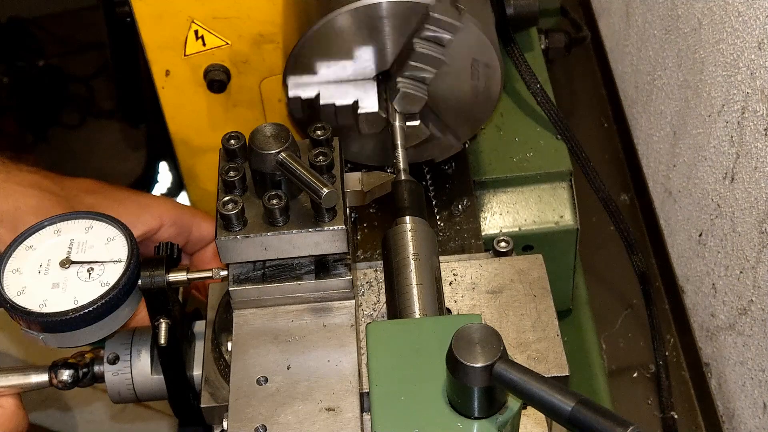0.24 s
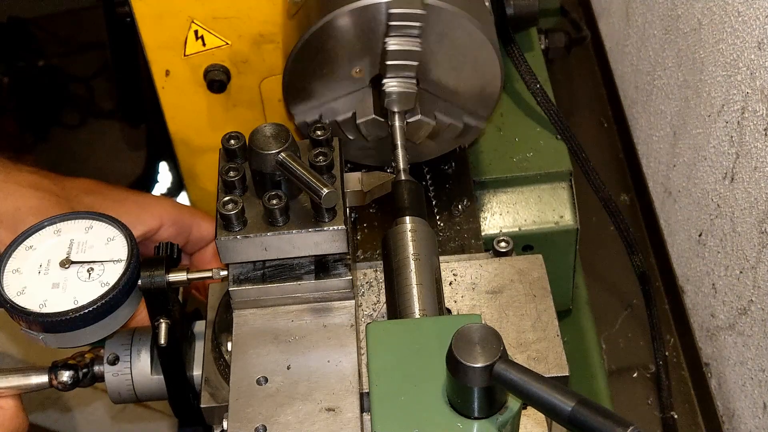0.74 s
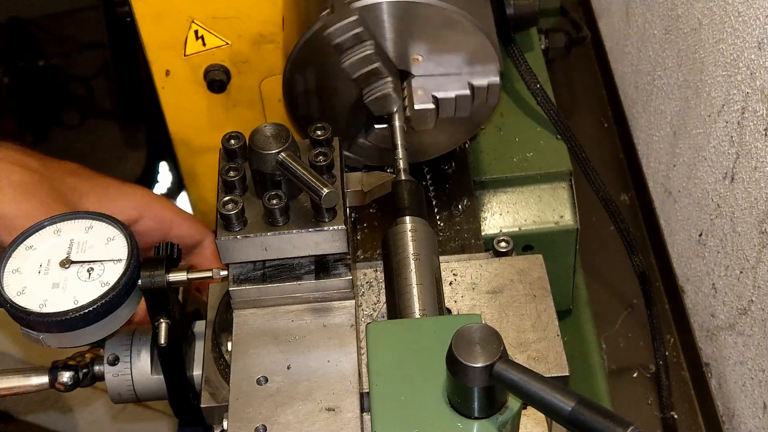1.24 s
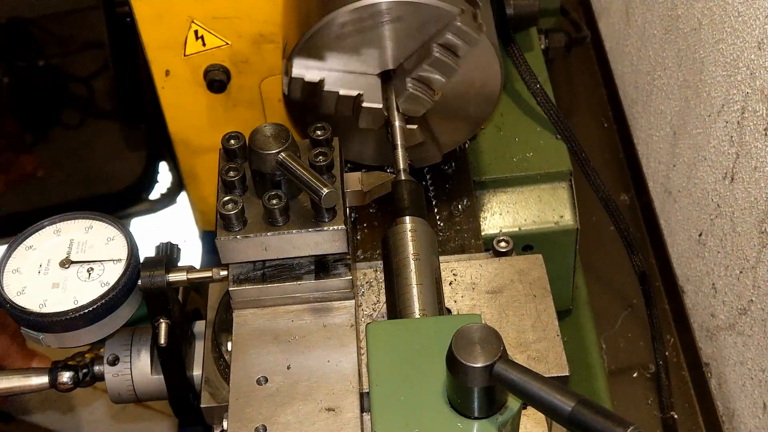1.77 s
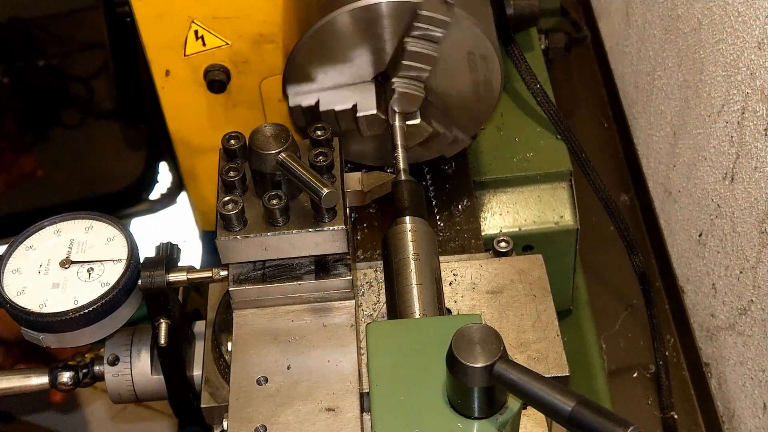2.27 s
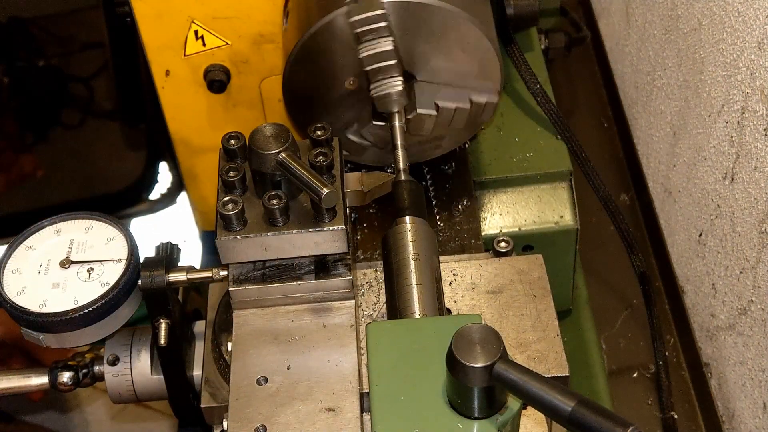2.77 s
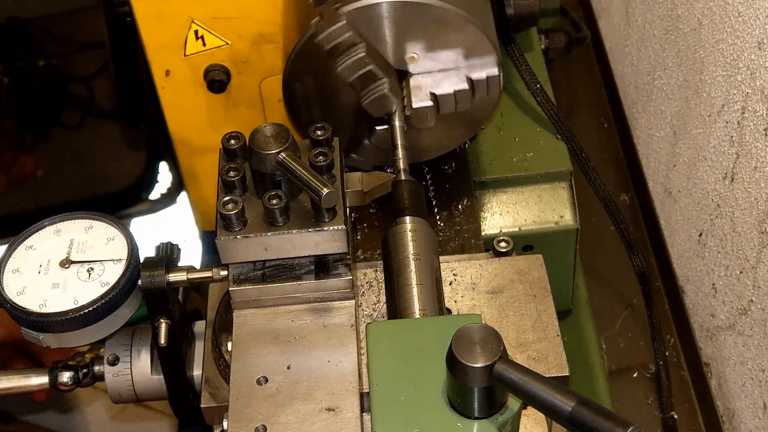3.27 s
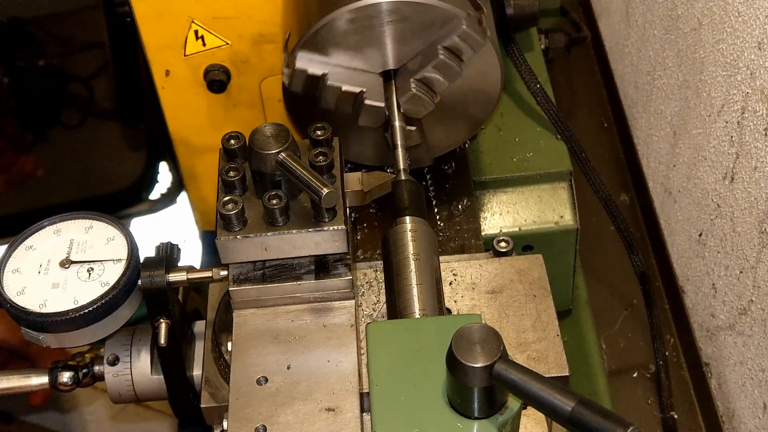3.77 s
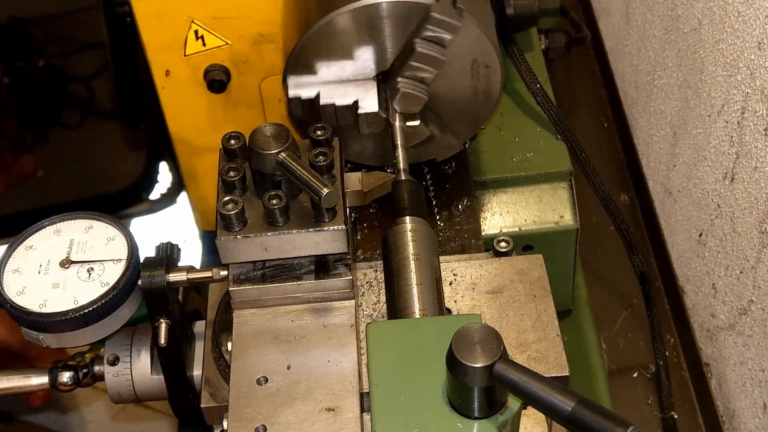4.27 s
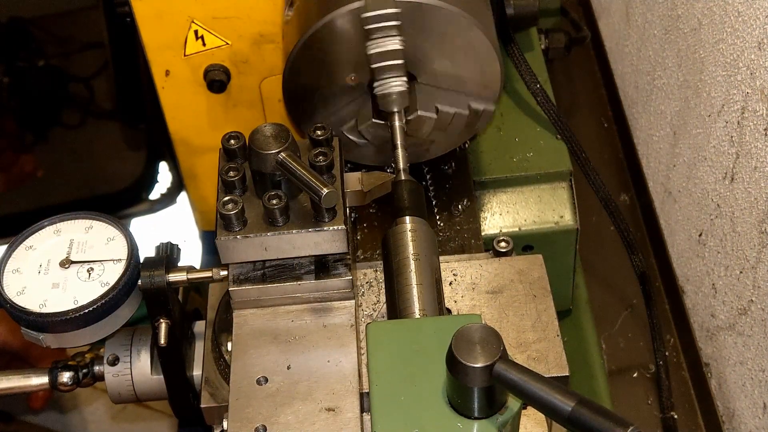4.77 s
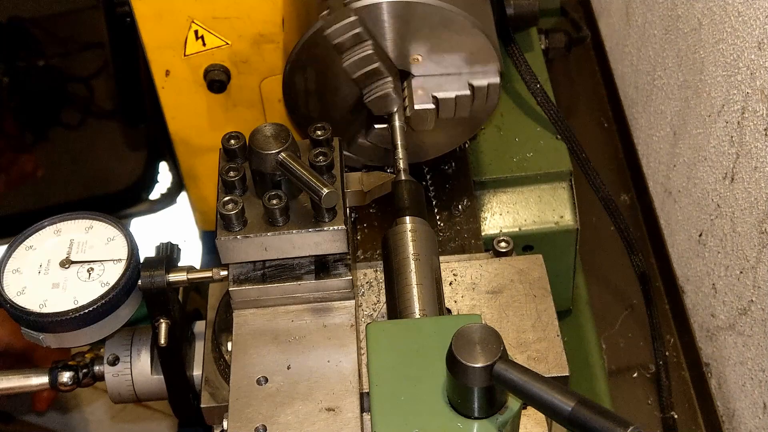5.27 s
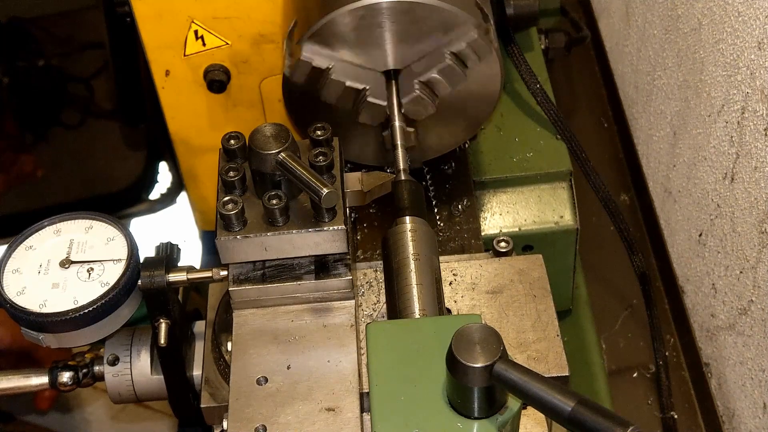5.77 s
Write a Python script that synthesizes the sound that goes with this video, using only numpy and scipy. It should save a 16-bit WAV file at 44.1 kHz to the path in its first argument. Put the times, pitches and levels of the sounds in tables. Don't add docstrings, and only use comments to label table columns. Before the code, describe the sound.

Close, dry workshop machine: wavering bass hum, hollow mid-low drone swelling about once a second, irregular gear clacks, short scuffs and flickering bearing hiss.

```python
import sys
import numpy as np
from scipy import signal
from scipy.fft import rfft, irfft, next_fast_len
from scipy.io import wavfile
from scipy.ndimage import uniform_filter1d

SR = 44100
rng = np.random.default_rng(int(sys.argv[2]) if len(sys.argv) > 2 else 0)


def wav_record(signal):
    frames = np.transpose(np.atleast_2d(signal))
    bounded = np.clip(frames, -1, 1)
    quanta = np.round(bounded * 32767).astype(np.int16)
    wavfile.write(sys.argv[1], SR, quanta)


def linear_from_db(decibels):
    return 10 ** (np.asarray(decibels, float) / 20)


N = 265923

SPINDLE_TURN_S = 2.012
CASING_HZ = 339.3
BAND_CENTRES_HZ = 15 * 2 ** np.arange(0, 10.6, 0.75)

# (frequency [Hz], level per Hz [dB])
HISS = [(2900, -3.5), (3150, -4.5), (3420, -15), (3850, -2), (4200, -10), (4560, 1.5), (5700, -10),
        (6500, -6.5), (7300, -10.5), (8400, -11), (9800, 4.5), (12150, -4), (14300, -3)]
# (frequency [Hz], width [Hz], level [dB])
COVER_EDGE = [(1514, 140, -1), (2275, 310, 3), (2580, 760, -2.5)]


def rms_one(x):
    return x / np.sqrt(np.mean(x ** 2) + 1e-20)


def at_hz(points, hz):
    points_hz, values = np.transpose(points)
    return np.interp(np.log(hz), np.log(points_hz), values)


def drift(rate_hz):
    r = np.exp(-80 * np.pi * rate_hz / SR)
    noise = rng.standard_normal(N // 40 + 2002)
    slow = signal.lfilter([1], [1, -2 * r, r * r], noise)[2000:]
    return np.interp(np.arange(N) / 40, np.arange(len(slow)), rms_one(slow))


def swells(rows, width_s):
    t = np.arange(0, N, 64) / SR
    total_db = sum(db * np.exp(-0.5 * ((t - s) / width_s) ** 2) for s, db in rows)
    return np.interp(np.arange(N) / SR, t, total_db)


def resonance(x, hz, width):
    r = np.exp(-np.pi * width / SR)
    zeros = (1 - r * r) / 2 * np.array([1, 0, -1])
    return signal.lfilter(zeros, [1, -2 * r * np.cos(2 * np.pi * hz / SR), r * r], x)


def machine_noise(spectrum, centres, shared_db, own_db, jolt):
    # (frequency [Hz], left-right likeness [0-1])
    likeness = [(30, 0.88), (85, 0.96), (170, 0.64), (340, 0.65), (700, 0.6), (1400, 0.077), (2800, 0.09),
                (5600, 0.12), (11000, .02)]
    size = next_fast_len(N)
    hz = np.maximum(np.arange(size // 2 + 1) * SR / size, 1)
    direct, room = rng.standard_normal((2, size))
    alike = np.clip(at_hz(likeness, hz), 0, 1)
    pair = np.sqrt(1 + alike) * rfft(direct) + np.sqrt(1 - alike) * rfft(room) * [[1], [-1]]
    pair = pair * linear_from_db(at_hz(spectrum, hz))
    out = 0
    for centre in centres:
        octaves = np.log2(hz / centre)
        band = np.cos(np.pi * np.clip(octaves / 1.5, -0.5, 0.5)) ** 2
        flicker = linear_from_db(shared_db * jolt + own_db * drift(24))
        out = out + flicker * irfft(pair * band, size)[:, :N]
    return rms_one(out)


def bearing_level():
    # (time [s], level [dB])
    load_shifts = [(0.12, -4.5), (0.35, 2), (0.92, 1), (1.33, 1.5), (1.8, -4.5), (2.42, -3.5), (2.5, 5.5),
                   (2.68, -3), (2.96, -3), (3.58, 2.5), (3.85, -0.5), (4.08, -3), (4.2, 4), (4.35, -4.5),
                   (4.5, 1), (4.8, 3), (4.92, 5), (5.18, -3.5), (5.4, 5), (5.6, -4), (5.75, 2),
                   (5.92, -5.5), (5.99, 4.5)]
    return -49.5 + swells(load_shifts, width_s=0.017)


def bearing_hiss(hiss_db):
    noise = machine_noise(HISS, BAND_CENTRES_HZ[13:], shared_db=2.0, own_db=1.42, jolt=drift(78))
    return linear_from_db(hiss_db + 3.5) * noise


def belt_whirr(hiss_db, load):
    noise = machine_noise(HISS, BAND_CENTRES_HZ[9:13], shared_db=0.5, own_db=1.45, jolt=load)
    return linear_from_db(0.28 * hiss_db - 37.5) * noise


def gear_rumble(load):
    # (frequency [Hz], level per Hz [dB])
    rumble_colour = [(15, -28), (35, -9.5), (48, -19.5), (75, -7.5), (105, -11.5), (135, -20), (185, -25.5),
                     (250, -18), (420, -25.5), (500, -27.5), (1150, -32), (1270, -39.5), (2600, -44.5),
                     (3000, -47)]
    # (time [s], level [dB])
    gear_load = [(0.0, -43), (0.23, -49.5), (1.17, -50.5), (1.54, -50), (1.95, -47), (2.27, -51),
                 (2.65, -45), (2.77, -46), (3.27, -49), (3.58, -54), (3.7, -49), (3.98, -47.5),
                 (4.28, -51.5), (4.94, -43.5), (5.27, -48.5), (5.48, -53.5), (6.03, -45)]
    load_db = np.interp(np.arange(N) / SR, *np.transpose(gear_load))
    noise = machine_noise(rumble_colour, BAND_CENTRES_HZ[:12], shared_db=1.48, own_db=2.36, jolt=load)
    return linear_from_db(-37 + 0.41 * (load_db - load_db.mean())) * noise


def singing_panels(load):
    # (frequency [Hz], width [Hz], level [dB rms])
    panels = [(770, 78, -54), (980, 39, -61.5), (1722, 120, -60.5), (12650, 130, -91)]
    direct, *room = rng.standard_normal((3, N))
    drive = (direct + 0.93 * np.array(room)) * linear_from_db(3.4 * load)
    return sum(linear_from_db(db) * rms_one(resonance(drive, hz, width)) for hz, width, db in panels)


def tooth_rasp():
    # (time into turn [s], level over steady rasp [dB])
    rasps = [
        (0.1, 3),
        (0.72, 10),
        (0.77, 3),
        (0.911, 6.5),
        (1.44, 10),
        (1.73, 7.5),
        (1.93, 7),
    ]
    clicks_per_s, floor_db, scuff_s = 900, -65, 0.012
    scuffs = [(s + SPINDLE_TURN_S * turn, db) for turn in range(3) for s, db in rasps]
    sizes = linear_from_db(4.4 * np.minimum(rng.exponential(1, (2, N)), 5))
    sizes = sizes * rng.choice([-1, 1], (2, N))
    clicks = sizes * (rng.random((2, N)) < clicks_per_s / SR) + 1e-18
    clicks = clicks + 0.54 * clicks[::-1]
    edge = sum(linear_from_db(db) * resonance(clicks, hz, width) for hz, width, db in COVER_EDGE)
    cover = linear_from_db(-3.5) * resonance(clicks, 900, 500)
    return linear_from_db(floor_db + swells(scuffs, scuff_s)) * rms_one(edge + cover)


def casing_drone():
    # (time into turn [s], level [dB])
    casing_turn = [
        (0.0, -43),
        (0.1, -35.5),
        (0.2, -42.5),
        (0.3, -37),
        (0.43, -40.5),
        (0.57, -51.5),
        (0.66, -43.5),
        (0.78, -39.5),
        (0.9, -43),
    ]
    # (time [s], level [dB])
    uneven_mesh = [(0.17, -8.5), (1.42, 0), (1.7, 6), (2.33, 3), (2.9, -3), (3.0, 2), (3.23, 10.5),
                   (3.9, -15), (4.0, -3.5), (4.25, 8), (4.48, -14), (4.85, 1.5), (5.3, 1.5), (5.75, 10),
                   (5.92, -5)]
    turn_db = np.interp(np.arange(N) / SR, *np.transpose(casing_turn), period=1.003)
    drone_db = turn_db + swells(uneven_mesh, width_s=0.053)
    ring = resonance(resonance(rng.standard_normal(N), CASING_HZ, 21.7), CASING_HZ, 70)
    chance_swell = np.sqrt(uniform_filter1d(ring ** 2, size=3000) + 1e-9)
    drone = linear_from_db(drone_db - 0.8) * rms_one(ring / chance_swell ** 2.05)
    return np.array([drone, np.roll(drone, 10)])


def bench_hum():
    # (time [s], level [dB])
    lurches = [(0.13, -3), (0.2, 9), (0.47, -6.5), (0.6, -7), (0.71, 6), (0.96, -4), (1.17, 7.5),
               (1.33, 3.5), (1.39, -7), (1.68, -24), (1.79, 6), (2.05, 0), (2.18, -12), (2.48, -13),
               (2.78, -7), (2.87, 8), (3.08, -8), (3.18, 7), (3.33, -17), (3.41, -11), (3.89, -27),
               (4.1, 6), (4.25, 5.5), (4.33, -5), (4.42, 3), (4.95, 5.5), (5.26, -8), (5.33, 2.5),
               (5.56, -9), (5.93, 5)]
    hum_db = -29.5 + swells(lurches, width_s=0.018)
    phase = 2 * np.pi * np.cumsum(87.7 + 4.93 * drift(20.4)) / SR
    steady = linear_from_db(1.7 * drift(25)) * np.sin(phase)
    shakes = drift(15.0) * np.sin(phase) + drift(17.8) * np.cos(phase)
    return linear_from_db(hum_db - 2.1) * rms_one(steady + 0.23 * shakes)


def knock_list():
    # (time into turn [s], peak [dB],
    # casing thud [dB re peak], bright edge [dB re peak], bed thump [dB re peak])
    turn_knocks = [(0.083, -28, 4, -12.5, -8), (0.101, -45, 5.5, -8, -7), (0.28, -44, 7.5, 0, -12),
                   (0.31, -40, 4, -10, -2), (0.604, -38.5, -2, -11, -13), (0.699, -50, -5, 2.5, -11),
                   (0.754, -33, 2.5, -11, -9), (0.892, -36.5, 1, -6, -3), (0.926, -44, 17, -8, 9),
                   (1.222, -45.5, 12.5, -22, -11), (1.335, -40, -15, -15, -22), (1.439, -42, 6.5, -1, 6),
                   (1.592, -47, 18, 0.5, 2), (1.719, -41.5, -2, -0.5, -1), (1.898, -39, 2.5, -7, -2)]
    # (time [s], peak [dB],
    # casing thud [dB re peak], bright edge [dB re peak], bed thump [dB re peak])
    single_knocks = [(0.022, -37, 4.5, -24, -23), (1.05, -54, 23, -13, -20), (1.136, -30.5, 6, -38, -24),
                     (3.009, -31.5, -3, -20, -10), (3.232, -49, 19, -22, -3), (3.906, -40.5, 9, 3, -9),
                     (4.952, -38, 16, -13, -8), (1.427, -30.5, -12, -20, 8), (3.432, -26, -10, -16, -20),
                     (5.449, -29.5, -4, -15, -21), (1.88, -30.5, -1, -24, -4.5), (3.939, -37.5, 7.5, -13, 6),
                     (4.107, -45.5, 16, 10, -14), (4.489, -29, -5, -33, -24), (5.959, -39, 16, -4, -19),
                     (5.967, -34.5, 11.5, 0, 7), (5.977, -35, 19, -11, 7), (5.992, -45.5, -5, -2, 12)]
    rows = np.array([(s + SPINDLE_TURN_S * turn, *rest) for turn in range(3) for s, *rest in turn_knocks])
    rows[:, 1] += 1.0 * rng.standard_normal(len(rows))
    return np.vstack([rows, single_knocks])


def ring_modes(x, modes):
    return sum(linear_from_db(db) * (-1) ** k * resonance(x, hz, width) for k, (hz, width, db) in enumerate(modes))


def gear_knocks():
    # (frequency [Hz], width [Hz], level [dB])
    cover_modes = [(560, 120, -5.5), (860, 67, -4.5), (1077, 116, 0), (1157, 170, -8.5)]
    t = np.arange(int(0.06 * SR)) / SR
    envelope = (1 - np.exp(-t / 0.00016)) * np.exp(-t / 0.011)
    soft = signal.butter(4, 3600, fs=SR, output="sos")
    knocks = knock_list()
    contacts = rng.standard_normal((len(knocks), len(t))) * envelope
    contacts[:, 20] += 5.0
    rattles = signal.sosfilt(soft, contacts)
    out = np.zeros(N + 2 * len(t))
    for (s, peak_db, thud_db, edge_db, thump_db), rattle in zip(knocks, rattles):
        rattle = np.pad(rattle, (0, len(t)))
        cover = ring_modes(rattle, cover_modes)
        edge = ring_modes(rattle, COVER_EDGE)
        thud = resonance(resonance(rattle, 1.02 * CASING_HZ, 92), CASING_HZ, 120)
        thump = resonance(resonance(rattle, 160, 76), 190, 140)
        parts = [(cover, 1.5), (edge, edge_db + 4.5), (thud, thud_db - 0.5), (thump, thump_db - 5.0)]
        start = round(s * SR)
        knock = sum(linear_from_db(peak_db + db) * x / np.abs(x).max() for x, db in parts)
        out[start:start + len(rattle)] += knock
    return out[:N]


def scene():
    load = drift(12.7)
    hiss_db = bearing_level()
    noise = bearing_hiss(hiss_db) + belt_whirr(hiss_db, load) + gear_rumble(load)
    metal = singing_panels(load) + tooth_rasp() + casing_drone()
    return noise + metal + bench_hum() + gear_knocks()


def slipped(x):
    # (time [s], lag of right behind left from here on [ms])
    slips = [(0, -0.2), (0.3, 0.4), (0.6, -0.7), (0.81, -0.34), (0.96, -0.02), (1.09, 1.8), (1.34, 2.4),
             (1.43, 2.99), (1.74, -3.4), (1.81, 6.2), (1.99, -0.05), (2.19, 5.9), (2.25, -1.7), (2.3, -2.6),
             (2.47, 1.3), (2.6, 2.93), (2.67, 4.67), (2.75, -0.36), (3.03, -3.95), (3.1, 3.8), (3.33, 1.32),
             (3.41, -0.9), (3.62, 0.68), (3.71, -0.63), (3.87, 0.2), (4.27, 0.66), (4.35, 2.1), (4.74, 0.3),
             (4.9, 2.31), (4.98, 0.1)]
    now, fade = np.arange(N), round(0.0067 * SR)
    starts, lag_ms = np.transpose(slips)
    piece = np.searchsorted(starts * SR, now, "right") - 1
    middle = (starts[np.maximum(piece, 0)] + np.append(starts, N / SR)[piece + 1]) * SR / 2
    neighbour = np.clip(piece + np.where(now > middle, 1, -1), 0, len(starts) - 1)
    out = 0
    for parity in (0, 1):
        mine = piece % 2 == parity
        near = np.where(mine, piece, neighbour)
        lag = np.round(lag_ms[near] * SR / 1000).astype(int)
        read = np.clip(now - lag, 0, N - 1)
        out = out + uniform_filter1d(mine * 1.0, fade, mode="nearest") * x[read]
    return out


def weak_bands_dropped(x):
    gate_db, gate_from_hz = -6, 2600
    window = ("kaiser", 6)
    hz, _, cells = signal.stft(x, SR, window, nperseg=2048, noverlap=1024)
    power = uniform_filter1d(np.abs(cells) ** 2, size=6, axis=1)
    power = uniform_filter1d(power, size=2, axis=2)
    bright = np.mean(power[:, (hz > 9500) & (hz < 11000)], axis=(1, 2), keepdims=True)
    wander_db = 1.6 * uniform_filter1d(rng.standard_normal(power.shape[1:]), size=9, axis=0) * 3
    margin = power / (bright * linear_from_db(gate_db + wander_db) ** 2)
    margin = 0.89 * margin + 0.3 * margin[::-1]
    keep = (margin > 1) | (hz < gate_from_hz)[:, None]
    return signal.istft(cells * keep, SR, window, nperseg=2048, noverlap=1024)[1][:, :N]


def roll_off(x):
    return signal.sosfilt(signal.butter(12, 15200, fs=SR, output="sos"), x)


def record(dry):
    # (frequency [Hz], left minus right [dB])
    ports = [(60, 0.5), (110, 1.5), (200, -5), (370, 0.5), (690, -2.5), (1270, 0.5), (2340, -2), (4310, -4),
             (7930, -4), (14600, -1)]
    size = next_fast_len(N)
    hz = np.maximum(np.arange(size // 2 + 1) * SR / size, 1)
    colour = linear_from_db(at_hz(ports, hz) * [[0.5], [-0.5]]) * (hz < 14270)
    left, right = irfft(rfft(dry, size) * colour, size)[:, :N]
    gated = weak_bands_dropped(np.array([left, slipped(right)]))
    return roll_off(gated - 0.0019)


dry = scene()
out = record(dry)
wav_record(out)
```